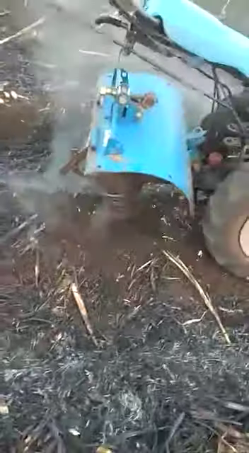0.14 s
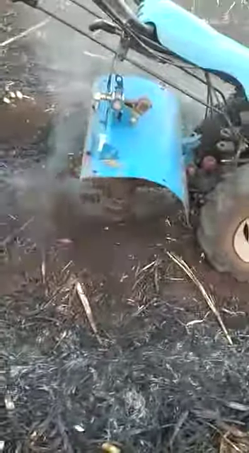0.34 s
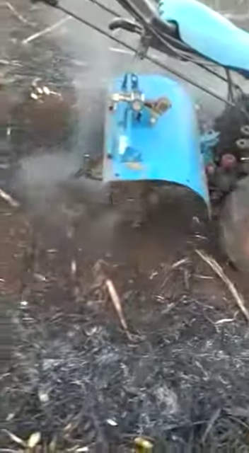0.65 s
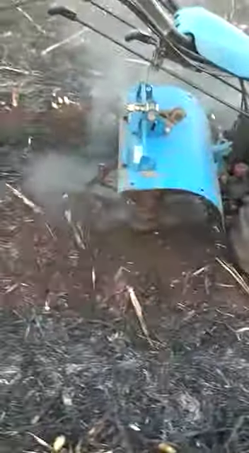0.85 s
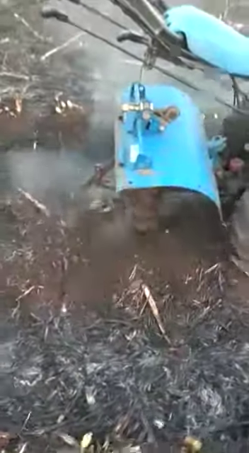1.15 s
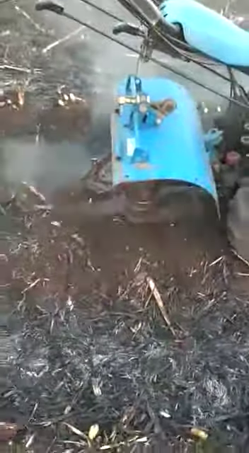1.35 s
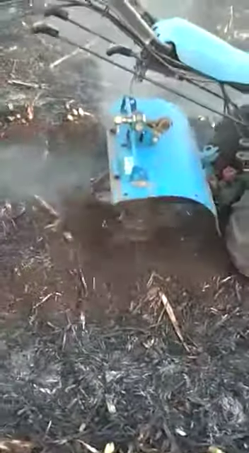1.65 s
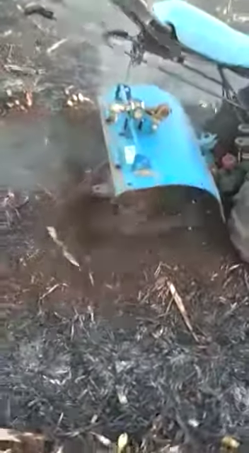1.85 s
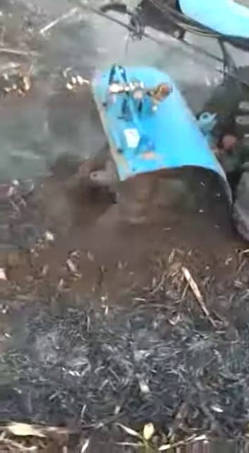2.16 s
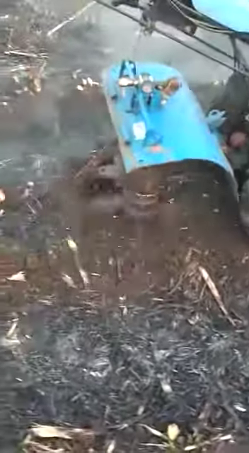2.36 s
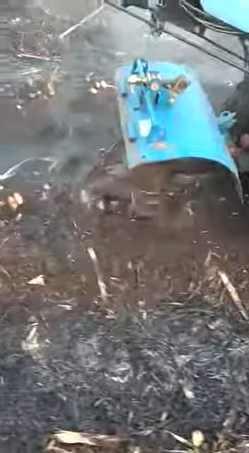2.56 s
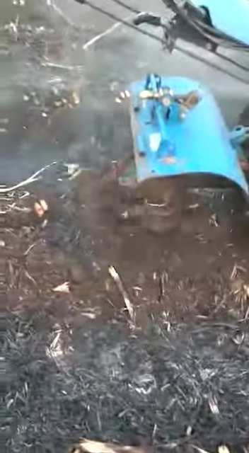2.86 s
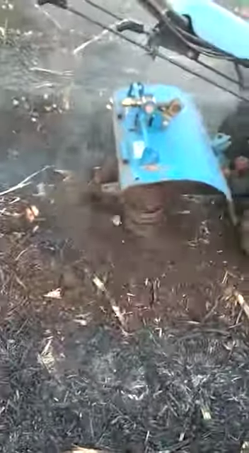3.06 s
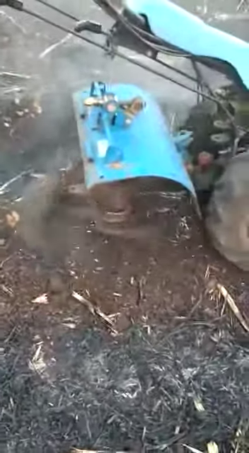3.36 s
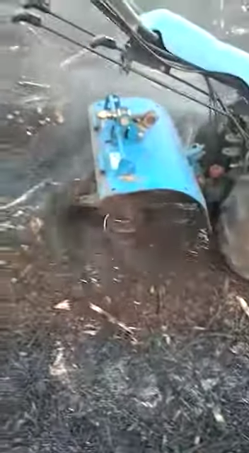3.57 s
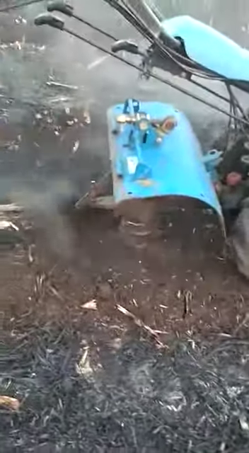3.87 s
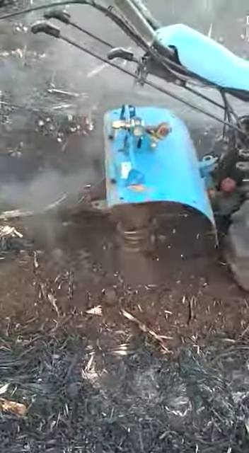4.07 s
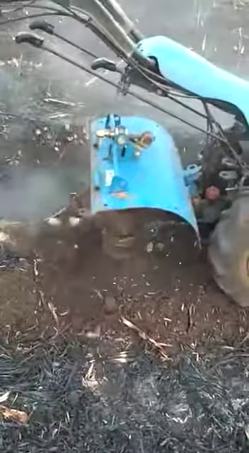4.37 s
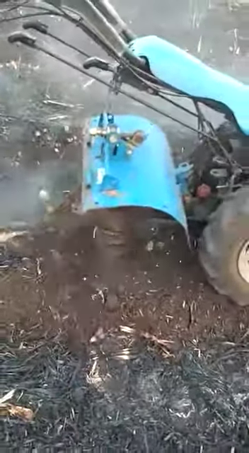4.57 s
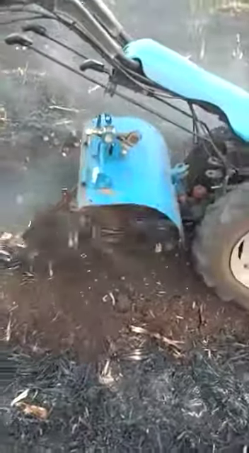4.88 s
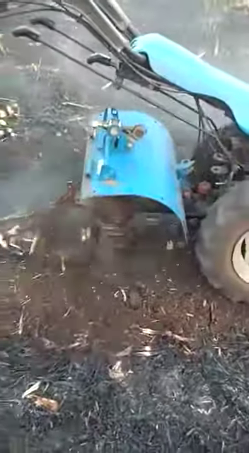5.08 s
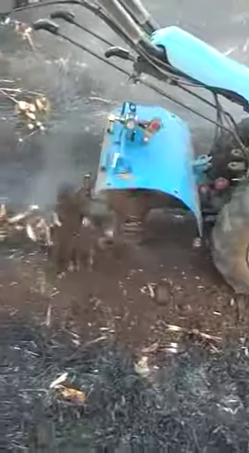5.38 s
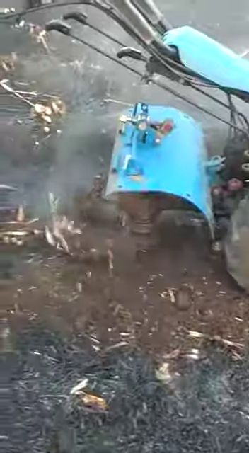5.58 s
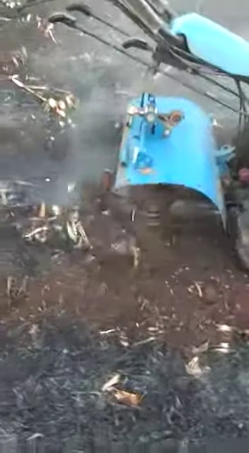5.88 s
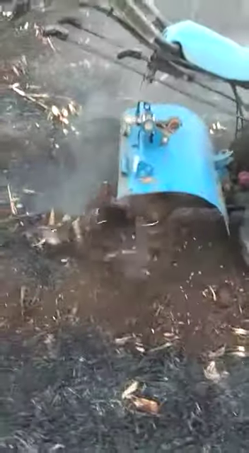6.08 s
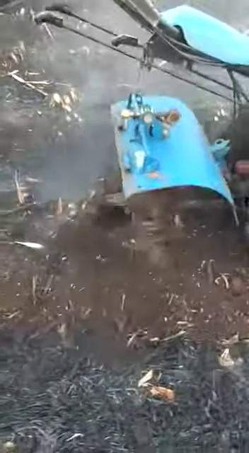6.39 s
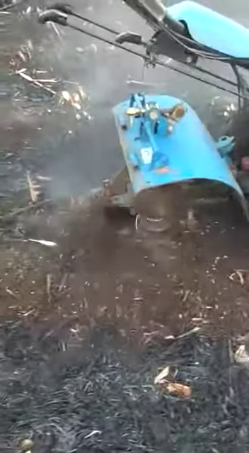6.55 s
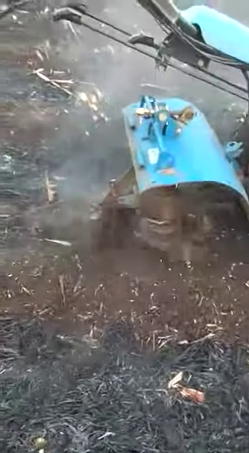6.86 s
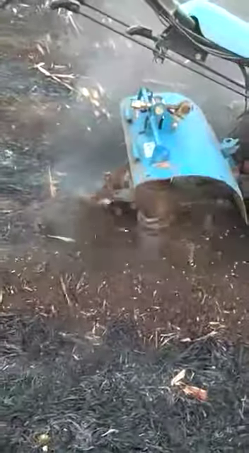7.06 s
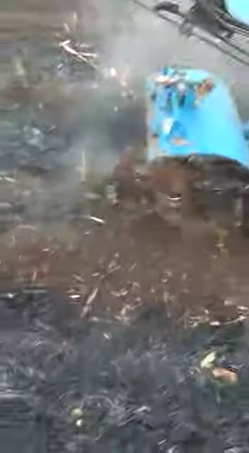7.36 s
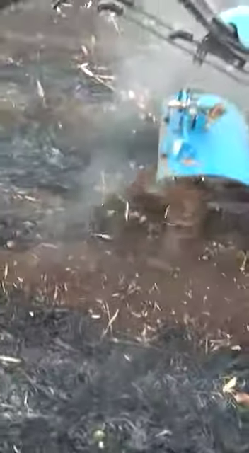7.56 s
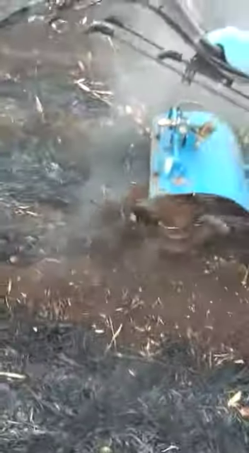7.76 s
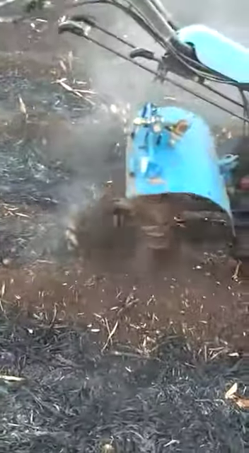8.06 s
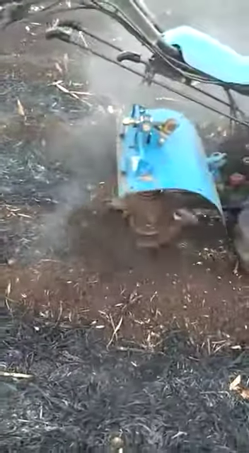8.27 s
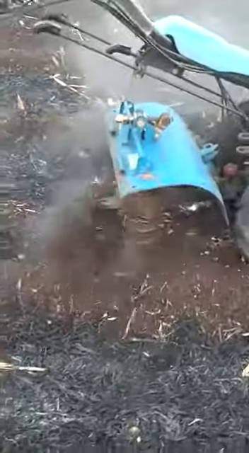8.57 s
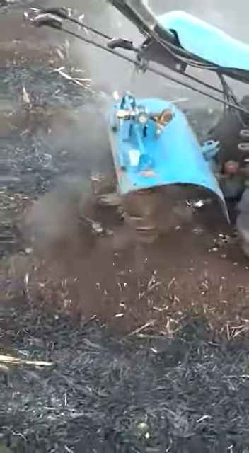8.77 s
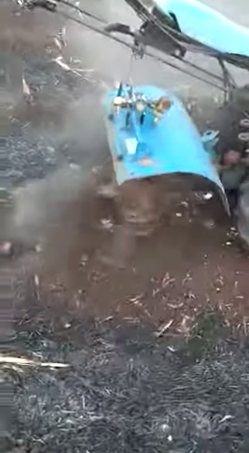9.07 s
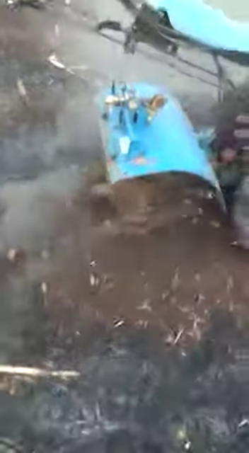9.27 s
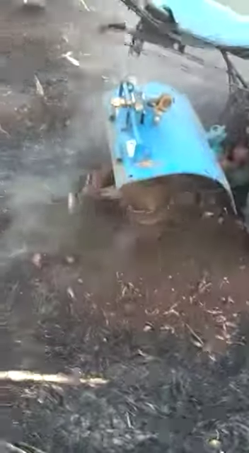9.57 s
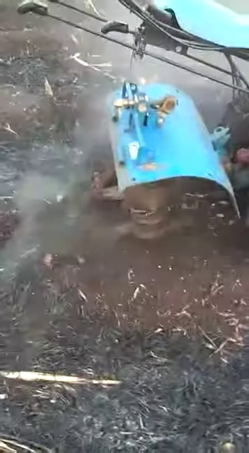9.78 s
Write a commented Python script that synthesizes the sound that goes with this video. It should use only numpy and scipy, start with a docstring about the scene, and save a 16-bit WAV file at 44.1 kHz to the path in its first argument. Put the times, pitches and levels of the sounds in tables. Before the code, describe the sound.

Close, continuous clatter of cane stubble chopped beneath a metal hood, with rapid diesel knocking, sharp cracks, clinks and thin dry squeals in an open field.

```python
"""Stalks rattle and crackle under the steel hood of a walk-behind tiller while its diesel knocks and puffs.
The single cylinder fires about 16 times a second: pulsed noise rings its metal and exhaust pipe.
Noise grains ring the hood and splinters as cane stubble is shredded; shaped noise makes flung grit.
Blurred sines make clods, clinks and guard knocks; a wavering tone with rasp is the dry bearing's squeal.
Scrapes, tumbling soil and a broad rumble fill the open field around them."""
import sys
import numpy as np
from scipy import signal
from scipy.fft import rfft, irfft, next_fast_len
from scipy.io import wavfile
from scipy.ndimage import uniform_filter1d

SR = 44100
rng = np.random.default_rng(int(sys.argv[2]) if len(sys.argv) > 2 else 0)


def digitize_waveform(pressure):
    """Quantize a signal to 16-bit integers and store it at the path in sys.argv[1].

    Rows of a 2-D input are taken as channels; values are limited to [-1, 1].
    """
    field = np.atleast_2d(pressure).T
    bounded = np.clip(field, -1, 1)
    quanta = np.round(bounded * 32767).astype(np.int16)
    wavfile.write(sys.argv[1], SR, quanta)


N = 437913

# engine speed, sagging and recovering: [t/s, firing rate/Hz]
SPEED = [(0, 15.846), (1.53, 15.876), (1.76, 15.756), (1.97, 15.483), (2.18, 15.44), (2.67, 16.133),
         (3.3, 15.725), (3.74, 15.952), (4.14, 15.733), (4.64, 15.71), (6.18, 15.927), (6.27, 15.767),
         (7.64, 15.857), (8.11, 15.651), (9.03, 15.767), (9.41, 16.058), (9.7, 15.771), (9.93, 15.659)]
# knock of block and crankcase: [t/s, relative level/dB]
KNOCK = [(0, -26), (0.6, -22.5), (1.58, -22.5), (2.3, -31.5), (2.85, -29), (3.25, -30.5), (3.95, -27),
         (4.35, -24), (4.7, -26.5), (5.8, -23), (6.35, -25), (6.95, -42.5), (7.75, -28.5), (8.08, -44),
         (8.52, -29), (9.15, -42), (9.54, -27), (9.93, -59)]


def from_db(db):
    """Decibels to gain."""
    return 10 ** (np.asarray(db) / 20)


def rms_one(x):
    """Scale to unit power."""
    return x / np.sqrt(np.mean(x ** 2) + 1e-20)


def even(x, size):
    """Hold the power near one over stretches of `size` samples, keeping the faster detail."""
    power = np.mean(np.atleast_2d(x) ** 2, axis=0)
    smooth = uniform_filter1d(uniform_filter1d(power, size), size)
    return x / np.sqrt(np.abs(smooth) + 1e-12)


def in_time(rows):
    """Each column of a curve at every sample."""
    s, *columns = np.transpose(rows)
    return [np.interp(np.arange(N) / SR, s, c) for c in columns]


def slow_chance(rate):
    """Smooth chance of spread 1 that changes about `rate` times a second, at every 40th sample."""
    r = np.exp(-80 * np.pi * rate / SR)
    white = rng.standard_normal(N // 40 + 2002)
    smooth = signal.lfilter([1], [1, -2 * r, r * r], white)
    return rms_one(smooth[2000:])  # drop the filter's start-up


def drift(rate):
    """Slow chance at every sample."""
    slow = slow_chance(rate)
    return np.interp(np.arange(N) / 40, np.arange(len(slow)), slow)


def flutter(depth_db, rate):
    """A level in dB that wanders by chance within plus and minus depth_db."""
    return depth_db * np.tanh(drift(rate))


def wobble(depth_db, rate):
    """A randomly wandering gain of unit power; depth_db bounds its swing before that scaling."""
    gain = rms_one(from_db(depth_db * np.tanh(slow_chance(rate))))
    return np.repeat(gain, 40)[:N]


def swells(rows, rest_db, attack_s, release_s):
    """Level in dB of events (s, length s, dB) that rise, hold and die away on top of a resting level."""
    gain, age = np.full(N + 2 * SR, from_db(rest_db)), np.arange(SR) / SR
    for s, length, db in rows:
        start = max(int(s * SR), 0)
        rise = np.minimum(age / attack_s, 1)
        fall = np.exp(-np.maximum(age - length, 0) / release_s)
        gain[start:start + SR] += from_db(db) * rise * fall
    return 20 * np.log10(gain[:N])


def blow(s, rise_s, decay_s):
    """Envelope of a single blow."""
    out, start = np.zeros(N), max(int(s * SR), 0)
    age = np.arange(min(SR // 3, N - start)) / SR
    out[start:start + len(age)] = (1 - np.exp(-age / rise_s)) * np.exp(-age / max(decay_s, .002))
    return out


def bursts(per_s, decay_s, spread_db):
    """Power of random impacts that start at once and die away; mean 1."""
    strength = from_db(spread_db * np.clip(rng.standard_normal(N), -2, 2)) ** 2
    hits = (rng.random(N) < per_s / SR) * strength
    power = signal.lfilter([1], [1, -np.exp(-2 / (decay_s * SR))], hits + 1e-18)
    return power / np.mean(power)


def stroke(cycle, at, rise_s, decay_s, spread_db):
    """A swell and decay once per engine cycle, starting at the cycle share `at`, each of its own strength."""
    count, share = np.divmod(cycle - at + 2, 1)
    age = share / np.mean(np.array(SPEED)[:, 1])
    strengths = from_db(spread_db * np.clip(rng.standard_normal(200), -2, 1.5))
    swell = (1 - np.exp(-(age / rise_s) ** 2)) * np.exp(-age / decay_s)
    return rms_one(strengths[count.astype(int)] * swell)


def hiss(scatter):
    """Stereo white noise: a direct part common to both ears and a scattered part for each."""
    white, scatter = rng.standard_normal((3, N)), np.clip(scatter, 0, 1)
    return np.sqrt(1 - scatter) * white[0] + np.sqrt(scatter) * white[1:]


def colour(x, spectrum, share=1):
    """Shape a sound by a smooth spectrum, its decibels multiplied by `share`."""
    size = next_fast_len(N + 2000)
    hz, db = np.transpose(spectrum)
    bins = np.maximum(np.arange(size // 2 + 1) * SR / size, 1)
    gain = from_db(share * np.interp(np.log(bins), np.log(hz), db))
    return irfft(rfft(x, size) * gain, size)[..., :N]


def resonate(x, modes, patchy_db=0, rate=12):
    """Parallel resonances of alternating sign; as the point of contact moves, each is driven more or less."""
    out, x = np.zeros(np.shape(x)), x + 1e-18
    for k, (hz, width, db) in enumerate(modes):
        r = np.exp(-np.pi * width / SR)
        top = (-1) ** k * from_db(db) * (1 - r * r) / 2
        drive = x * wobble(patchy_db, rate) if patchy_db else x
        out += signal.lfilter([top, 0, -top], [1, -2 * r * np.cos(2 * np.pi * hz / SR), r * r], drive)
    return out


def struck(events, level_db, rise_s, decay_s, rough):
    """Each blow rings a part at a pitch of its own, blurred by the chatter of the contact."""
    t, blur = np.arange(N) / SR, rough * drift(60)
    out = np.zeros(N)
    for s, db, hz in events:
        swell = blow(s, rise_s, decay_s)
        on = swell > 0
        out[on] += from_db(db + level_db) * swell[on] * np.sin(2 * np.pi * hz * t[on] + blur[on])
    return out


def over_ground(x, delay_s, sway_s, share):
    """Add the reflection from the ground; its delay sways as the machine rocks, and so does the colour."""
    n = np.arange(N)
    lag = (delay_s + sway_s * drift(1.77)) * SR
    echo = np.array([np.interp(n - lag, n, ear) for ear in x])
    return (x + share * echo) / np.sqrt(1 + share ** 2)


def rumble():
    """Gears and soil make a broad, nearly central noise whose level wanders."""
    # rumble spectrum: [f/Hz, relative level/dB]
    rumble_spectrum = [(25, -23), (50, -5), (90, -3), (170, 0.5), (320, 4), (500, 12), (800, -3.5),
                       (1050, -24), (1300, 6.5), (2000, 7.5), (3000, 7.5), (8000, -3), (15000, 3)]
    return from_db(-40) * rms_one(colour(hiss(0.04), rumble_spectrum)) * wobble(5.2, 8.1)


def soil():
    """Crumbs of earth drum all the time in the hollow under the hood."""
    # hollow under the hood: [f/Hz, width/Hz, relative level/dB]
    hollow_modes = [(516, 42, 0.5), (869, 89, 1.5), (1012, 41, 2.5), (1085, 49, 2.5)]
    drumming = hiss(0.48) * np.sqrt(0.32 + bursts(60, 0.0018, 2.9))
    hollow = resonate(drumming, hollow_modes, patchy_db=8.0, rate=6.7)
    hollow = resonate(hollow, [(990, 1400, 0)])
    level_db = -46 + flutter(depth_db=5.5, rate=6.5)
    return from_db(level_db) * even(hollow, size=4000)


def hum(cycle):
    """The running engine shakes its frame at a few multiples of the firing rate."""
    # steady partials: [multiple of the firing rate, rms level/dB]
    partials = [(7, -65.5), (8, -71.5), (11, -60), (17, -66.5)]
    out = np.zeros(N)
    for order, db in partials:
        tone = np.sqrt(2) * np.sin(2 * np.pi * (round(order) * cycle + rng.random()))
        out += from_db(db) * wobble(2.1, 6.5) * tone
    return out


def guard(cycle):
    """A sheet-metal guard is jolted by the valve gear and on each of the two crank turns of a cycle."""
    # sheet-metal modes: [f/Hz, width/Hz, relative level/dB]
    guard_modes = [(685.6, 22.6, 1), (755.4, 19.6, -1), (766, 28, -6.5)]
    # rattle: [t/s, relative level/dB]
    shaking = [(0, -30), (0.65, -32), (1.4, -34), (2.1, -41), (3.1, -49), (3.4, -43.5), (4.3, -41.5),
               (4.9, -37), (5.4, -29.5), (5.8, -32), (6.7, -42.5), (7.1, -36), (7.8, -33.5), (8.05, -53),
               (8.35, -46.5), (9.93, -42)]
    jolts = 0.18 + stroke(cycle, -0.084, 0.0013, 0.0094, 4.5)
    jolts += 1.4 * stroke(cycle, 0.4, 0.00076, 0.0048, 9.6)
    jolts += 0.59 * stroke(cycle, -0.334, 0.00095, 0.0043, 3.9)
    ring = resonate(resonate(hiss(0.046) * jolts, guard_modes), [(757, 137, 0)])
    level_db = in_time(shaking)[0] + flutter(depth_db=3.5, rate=2.8)
    return from_db(level_db - 5.5) * even(ring, size=5500)


def guard_knocks():
    """The guard knocks against its bracket and rings briefly near 700 Hz."""
    # knocks: [t/s, relative level/dB, f/Hz]
    knocks = [(0.056, -25, 705), (0.157, -22.5, 730), (0.245, -23.5, 716), (0.31, -27, 692),
              (0.449, -27, 705), (0.497, -23, 716), (0.6, -25, 694), (0.623, -20.5, 705), (0.877, -23, 705),
              (0.918, -24.5, 729), (0.97, -19.5, 716), (1.068, -24, 702), (1.32, -21, 708),
              (1.385, -21, 727), (1.476, -23, 716), (1.829, -24, 719), (4.479, -26, 711), (4.835, -26, 686),
              (4.942, -22.5, 721), (5.116, -25, 694), (5.35, -27.5, 732), (5.408, -23, 700),
              (5.466, -22.5, 711), (5.558, -27, 700), (5.59, -21.5, 706), (5.636, -29, 740),
              (5.749, -22.5, 690), (5.807, -22.5, 705), (5.986, -30, 711), (7.175, -25, 711),
              (7.341, -28, 721), (7.49, -29, 736), (7.768, -28, 694), (8.27, -29.5, 713), (8.449, -30, 715),
              (8.675, -31, 688)]
    return struck(knocks, 1.0, rise_s=0.0013, decay_s=0.019, rough=0.27)


def exhaust(cycle):
    """A thump at firing, then the valve opens and gas leaves in three surges that ring the pipe."""
    # exhaust pipe: [f/Hz, width/Hz, relative level/dB]
    pipe_modes = [(180, 55, 0.91), (220, 63, -2.6), (268.4, 34, -0.81)]
    # spells of louder puffs: [t/s, length/s, relative level/dB]
    puffs = [(-0.01, 0.31, -43.5), (0.38, 0.14, -34.5), (1.03, 0.27, -54), (2.496, 0.23, -52),
             (3.2, 0.27, -56), (3.679, 0.1, -42), (4.321, 0.1, -49), (5.406, 0.7, -43.5),
             (6.781, 0.13, -42.5), (7.128, 0.57, -41), (9.002, 0.52, -48.5)]
    surge_spread_db = 3  # the surges differ from stroke to stroke
    thump = from_db(-3.0) * stroke(cycle, -0.0815, 0.0011, 0.002, 0.93)
    opening = from_db(5.5) * stroke(cycle, 0.124, 0.001, 0.0035, surge_spread_db)
    blowdown = from_db(8.0) * stroke(cycle, 0.2527, 0.0018, 0.0023, surge_spread_db)
    last = from_db(-3.0) * stroke(cycle, 0.431, 0.0009, 0.0024, surge_spread_db)
    gas = (thump + opening + blowdown + last) * (1 + .4 * hiss(0.17))  # pressure with turbulence
    gas = signal.sosfilt(signal.butter(4, [150, 340], "band", fs=SR, output="sos"), gas)
    ring = even(resonate(gas, pipe_modes, patchy_db=4.5, rate=13.0), size=8400)
    level_db = swells(puffs, rest_db=-51, attack_s=0.055, release_s=0.057)
    level_db = level_db + flutter(depth_db=4.0, rate=6.6)
    return from_db(level_db - 4.0) * ring


def valves(cycle):
    """The valve gear ticks three times a cycle, as wide noise ringing high metal modes."""
    # valve gear: [f/Hz, width/Hz, relative level/dB]
    valve_modes = [(5370, 73, -10), (8050, 760, -2.5), (9490, 150, 13), (10530, 110, 14), (11960, 900, -2)]
    # ticking: [t/s, relative level/dB]
    ticking = [(0, -23), (1.5, -24), (2.9, -26), (3.5, -24.5), (5, -24.5), (5.9, -25.5), (6.6, -24.5),
               (7.6, -26.5), (8.5, -38), (9, -31), (9.93, -27.5)]
    ticks = stroke(cycle, -0.267, 0.0029, 0.0034, 3.5)
    ticks += 0.32 * stroke(cycle, 0.032, 0.0014, 0.0046, 8.8)
    ticks += 0.054 * stroke(cycle, 0.43, 0.001, 0.0047, 2.7)
    return from_db(in_time(ticking)[0] - 8.5) * rms_one(resonate(hiss(0.92) * ticks, valve_modes))


def block(cycle):
    """The piston slaps the block around firing and about a turn later."""
    # engine block: [f/Hz, width/Hz, relative level/dB]
    block_modes = [(491, 35, -24), (750, 220, -15.5), (1000, 19, -30), (1394, 31, 8), (1740, 45, -32)]
    slaps = 1.12 * stroke(cycle, -0.099, 0.0031, 0.011, 0.73)
    slaps += stroke(cycle, 0.012, 0.0034, 0.0063, 2.4)
    slaps += 0.6 * stroke(cycle, 0.433, 0.0042, 0.0071, 3.0)
    ring = even(resonate(hiss(0.19) * slaps, block_modes), size=2800) * wobble(7.7, 31)
    return from_db(in_time(KNOCK)[0] - 8) * ring


def crankcase(cycle):
    """The crankcase rings at every firing, following the knock above a steady floor."""
    # crankcase: [f/Hz, width/Hz, relative level/dB]
    case_modes = [(1405, 49, 0)]
    firing = hiss(0.15) * stroke(cycle, -0.041, 0.0018, 0.0034, 1.0)
    ring = resonate(resonate(firing, case_modes), [(1393, 147, 0)])
    ring = even(ring, size=2800) * wobble(4.0, 19)
    return np.hypot(from_db(-44), from_db(in_time(KNOCK)[0] - 10.5)) * ring


def head(cycle):
    """Combustion cracks in the cylinder head, dulled in the treble and wandering in level."""
    # cylinder head: [f/Hz, width/Hz, relative level/dB]
    head_modes = [(1880, 70, 0), (2065, 31, -4)]
    # crack of combustion: [t/s, level/dB]
    cracking = [(0, -34.5), (1.2, -31.5), (2.0, -36), (2.8, -34.5), (3.5, -33.5), (4.2, -33.5),
                (5.0, -38.5), (5.8, -44), (6.5, -38.5), (7.5, -38), (8.3, -43), (9.2, -44), (9.93, -36)]
    firing = hiss(0.5) * stroke(cycle, -0.029, 0.0018, 0.0043, 0.83)
    ring = even(resonate(firing, head_modes, patchy_db=10.0), size=2800) * wobble(3, 5.8)
    dull = signal.butter(5, 2470, fs=SR, output="sos")  # low-pass in Hz
    return from_db(in_time(cracking)[0]) * rms_one(signal.sosfilt(dull, ring))


def diesel(cycle):
    """Piston slap, crankcase ring, combustion crack and valve ticks add up to the engine's knock."""
    return block(cycle) + crankcase(cycle) + head(cycle) + valves(cycle)


def bearing():
    """Stick and slip in a dry bearing keep one very high mode ringing, in fits."""
    # squeals: [t/s, length/s, relative level/dB]
    squeals = [(0.096, 0.056, -32), (0.395, 0.046, -32), (0.479, 0.2, -43), (0.511, 0.015, -26.5),
               (0.579, 0.035, -34), (0.954, 0.15, -38), (1.157, 0.12, -40), (1.62, 0.33, -34),
               (1.708, 0.057, -19), (1.856, 0.28, -40), (1.995, 0.015, -28), (2.159, 0.16, -37),
               (2.271, 0.054, -30), (2.371, 0.3, -46), (2.478, 0.015, -23.5), (2.662, 0.016, -27),
               (3.105, 0.26, -41), (3.839, 0.3, -41), (4.302, 0.13, -32.0), (4.526, 0.29, -39),
               (4.546, 0.038, -19.0), (4.673, 0.02, -22), (4.761, 0.23, -38), (4.949, 0.3, -39),
               (4.99, 0.015, -28), (5.14, 0.08, -31), (5.153, 0.011, -24), (5.276, 0.035, -22),
               (5.432, 0.11, -29), (5.5, 0.043, -25), (5.583, 0.1, -38.0), (6.098, 0.18, -27.5),
               (6.24, 0.015, -35), (6.322, 0.15, -38.0), (6.657, 0.025, -29), (6.701, 0.05, -21.5),
               (6.952, 0.2, -42), (7.363, 0.14, -33), (7.619, 0.23, -43), (7.659, 0.13, -33),
               (8.026, 0.17, -37), (8.297, 0.27, -36), (8.322, 0.0086, -18), (8.405, 0.063, -28),
               (8.58, 0.22, -39.5), (8.608, 0.015, -24), (8.86, 0.05, -27), (9.187, 0.11, -32),
               (9.212, 0.018, -30), (9.439, 0.018, -30), (9.63, 0.25, -42), (9.722, 0.014, -16.5)]
    pitch_hz = 14260 + 18 * drift(45)
    tone = np.sqrt(2) * np.sin(2 * np.pi * np.cumsum(pitch_hz) / SR)
    rasp = rms_one(resonate(resonate(hiss(0.98), [(14350, 130, 0)]), [(14200, 120, 0)]))
    level_db = swells(squeals, rest_db=-50.5, attack_s=0.011, release_s=0.014)
    level = from_db(level_db - 6.5) * wobble(2.8, 26)
    return level * (from_db(10.5) * tone + from_db(8.0) * rasp)


def scrapes():
    """A stalk dragged along the hood rubs the steel: a rough swell around one pitch."""
    # scrapes: [t/s of the loudest moment, level/dB, f/Hz, half-length/s]
    rubs = [(1.641, -34, 1670, 0.033), (1.703, -33.5, 1160, 0.036), (2.082, -29.5, 1180, 0.027),
            (2.23, -29, 1110, 0.022), (2.292, -26, 2500, 0.062), (3.397, -32.5, 1040, 0.047),
            (3.669, -36, 1044, 0.052), (4.23, -32, 1135, 0.035), (4.952, -26, 2110, 0.016),
            (7.112, -29, 2440, 0.057), (7.581, -39.5, 984, 0.15), (7.653, -39, 1610, 0.17),
            (8.033, -28.5, 2540, 0.044), (8.196, -27.5, 2550, 0.045), (8.648, -31.5, 1690, 0.051),
            (9.803, -25, 2360, 0.041)]
    out, size = np.zeros((2, N + SR)), SR // 2
    age = np.arange(size) / SR - .25
    for s, db, hz, length in rubs:
        slips = rng.standard_normal(size) + .5 * rng.standard_normal((2, size))
        rub = rms_one(resonate(resonate(slips, [(hz, hz / 7, 0)]), [(hz, hz / 13.0, 0)]))
        start = int((s + age[0]) * SR)
        out[:, start:start + size] += from_db(db) * rub * np.exp(-(age / length) ** 2)
    return out[:, :N]


def clods():
    """Clods thud against the hood: low, softly rising blows."""
    # thuds: [t/s, relative level/dB, f/Hz]
    thuds = [(0.04, -27, 425), (1.815, -29, 358), (1.83, -23, 800), (1.85, -31.5, 560), (2.355, -23, 720),
             (2.407, -26, 495), (2.72, -30, 522), (3.025, -21.5, 720), (3.348, -35, 501), (4.653, -22, 403),
             (5.76, -28, 565), (6.58, -25.5, 482), (6.681, -26, 460), (6.78, -20, 488), (6.89, -29, 942),
             (7.081, -26.5, 528), (7.81, -28, 1055)]
    return struck(thuds, -1.9, rise_s=0.0026, decay_s=0.015, rough=0.49)


def clinks():
    """Stones and loose steel parts clink: high, quick and slightly blurred rings."""
    # clinks: [t/s, relative level/dB, f/Hz]
    clink_events = [(0.408, -14, 2430), (0.443, -19, 2417), (0.645, -26, 4170), (1.654, -9, 3650),
                    (2.472, -13, 1834), (2.866, -13.5, 4120), (3.059, -17.5, 2340), (3.306, -10, 4970),
                    (3.3344, -1, 5470), (4.213, -15, 2430), (4.249, -17, 2380), (4.57, -17.5, 2460),
                    (4.9387, -15, 2325), (7.289, -15.5, 2370), (7.4494, -20, 2360), (7.466, -16, 2390),
                    (7.697, -13, 3550), (8.0544, -12, 3530), (8.3544, -19, 2370), (8.772, -20, 2358),
                    (9.286, 5, 5470), (9.613, -19, 2330), (9.82, -7.5, 2425), (9.9015, -8.5, 2380)]
    return struck(clink_events, -2.5, rise_s=0.00075, decay_s=0.014, rough=0.93)


def sprays():
    """In each spray, grains of grit ring at pitches scattered around its own."""
    # sprays of grit: [t/s, length/s, relative level/dB, f/Hz]
    spray_events = [(0.102, 0.032, -41, 9500), (0.406, 0.13, -35, 10540), (0.572, 0.14, -31, 9540),
                    (0.782, 0.053, -29, 10300), (0.933, 0.095, -26, 9470), (1.45, 0.066, -31, 8900),
                    (1.613, 0.13, -45, 9200), (1.712, 0.31, -35, 9200), (1.87, 0.15, -49, 9600),
                    (2.084, 0.13, -40, 9500), (2.267, 0.022, -23, 10900), (2.454, 0.055, -30.5, 10300),
                    (2.889, 0.12, -35, 10050), (3.097, 0.061, -33, 10300), (3.84, 0.14, -42, 9600),
                    (4.076, 0.12, -34, 10000), (4.258, 0.19, -30.5, 10600), (4.294, 0.027, -20, 12000),
                    (4.448, 0.042, -22, 11260), (4.54, 0.035, -42, 9300), (4.56, 0.095, -30, 9600),
                    (4.658, 0.035, -26, 9740), (4.761, 0.065, -26.5, 9600), (4.949, 0.067, -27.5, 9200),
                    (5.098, 0.054, -35, 10100), (5.194, 0.16, -31, 9800), (5.407, 0.091, -34.5, 10300),
                    (5.503, 0.15, -35, 10100), (5.743, 0.042, -33, 10200), (5.94, 0.064, -28, 10100),
                    (6.07, 0.07, -37, 10100), (6.244, 0.083, -36.5, 10200), (6.408, 0.18, -40, 9800),
                    (6.653, 0.11, -40, 9700), (6.95, 0.041, -30, 10200), (7.119, 0.035, -24, 11000),
                    (7.271, 0.05, -28.5, 10800), (7.429, 0.2, -34, 9740), (7.61, 0.19, -31.5, 10900),
                    (7.872, 0.012, -24, 11000), (8.025, 0.031, -18.5, 11200), (8.056, 0.12, -37.5, 10000),
                    (8.254, 0.055, -28.5, 9860), (8.414, 0.054, -39, 10100), (8.576, 0.052, -31, 9870),
                    (8.87, 0.077, -37, 9600), (9.206, 0.015, -42, 10760), (9.715, 0.088, -33, 10200)]
    out, age = np.zeros((2, N + SR)), np.arange(SR // 3) / SR
    for s, length, db, hz in spray_events:
        sizes = [(f, f / 50, 4 * rng.normal()) for f in hz * np.geomspace(.92, 1.35, num=9)]
        grains = rms_one(resonate(rng.standard_normal((2, len(age))), sizes))
        start = max(int(s * SR), 0)
        swell = np.minimum(age / 0.012, 1) * np.exp(-np.maximum(age - length, 0) / .014)
        out[:, start:start + len(age)] += from_db(db + 4.0) * grains * swell
    return out[:, :N]


def loose_grit():
    """Flung grit hisses in irregular showers of bright noise, at unit power."""
    # grit spectrum: [f/Hz, relative level/dB]
    grit_spectrum = [(3000, -48), (7000, 1), (10000, 14.5), (12000, 15), (13500, 7), (15000, 5),
                     (16000, -29.5)]
    shower = hiss(0.98) * np.sqrt(0.22 + bursts(760, 0.0042, 7.9))
    return rms_one(colour(shower, grit_spectrum))


def hood_ring():
    """Grains of impact ring the steel hood, which caked earth damps, at even power."""
    # cutter hood: [f/Hz, width/Hz before damping, relative level/dB]
    hood_modes = [(1070, 43, -15), (1358, 60, -7.5), (1710, 40, 9), (1886, 210, -4), (2335, 33, 5),
                  (2422, 62, 2), (2645, 35, 8.5), (2865, 55, -4.5), (3198, 35, 1.5), (3510, 30, 11.5),
                  (3637, 37, 8.5), (4050, 45, 7), (4188, 45, 8.5), (4570, 40, 2), (4960, 70, 7),
                  (5157, 49, 4), (5424, 34, 9.5), (5610, 37, 2.5), (5810, 37, 7), (6270, 50, 3),
                  (6550, 50, 2.5), (7120, 68, -6), (7330, 45, -7), (8380, 34, -3.5), (8820, 210, 2.5),
                  (9520, 76, 3), (10580, 85, 2.5)]
    damping_hz = 45  # no ring is narrower
    grains = rms_one(np.sqrt(0.64 + bursts(1200, 0.00069, 1.0)) * hiss(0.72))
    damped = [(hz, max(width, damping_hz), db) for hz, width, db in hood_modes]
    return even(resonate(grains, damped, patchy_db=12.0, rate=6.55), size=1500)


def shredding(snaps):
    """Splinters of every length ring briefly, each at its own pitch, at even power."""
    # shredding spectrum: [f/Hz, relative level/dB]
    shred_spectrum = [(200, -43), (450, -17.5), (900, -13), (2200, -10), (2750, 26), (3000, 12), (3300, 12),
                      (3550, 10.5), (3880, 7), (4150, 23), (4380, 11.5), (4900, 18.5), (7000, 17.5),
                      (9500, 17.5), (11500, -10), (16000, -24)]
    splinters = [(hz, hz / 85, 0) for hz in np.geomspace(3270, 10400, num=32)]
    cracks = resonate(snaps, splinters, patchy_db=11.0, rate=7.5) + 0.11 * snaps
    return even(colour(cracks, shred_spectrum), size=1500)


def feed():
    """Levels of ring and crackle in the cutter: each bunch is drawn in, shredded and thrown clear."""
    # bunches of stalks: [t/s, length/s, relative hood ring level/dB, relative crackle level/dB]
    bunches = [(0.0, 0.014, -35, -44), (0.076, 0.059, -33, -46), (0.263, 0.082, -56, -29.5),
               (0.375, 0.3, -36.5, -38), (0.395, 0.011, -47, -36), (0.567, 0.14, -45, -41),
               (0.571, 0.051, -34, -35), (0.734, 0.12, -45, -40), (0.754, 0.26, -39, -34),
               (0.942, 0.071, -37, -35), (0.974, 0.42, -43, -35), (1.177, 0.055, -39, -30),
               (1.257, 0.27, -42, -35.5), (1.337, 0.014, -31, -34), (1.449, 0.22, -43.5, -34.5),
               (1.481, 0.032, -44, -23.5), (1.62, 0.076, -32, -34), (1.684, 0.27, -43, -26.5),
               (1.824, 0.12, -37, -26), (1.828, 0.27, -34.5, -35), (1.995, 0.033, -42, -21),
               (2.055, 0.25, -33.5, -26.5), (2.087, 0.013, -28, -20), (2.271, 0.011, -36, -18),
               (2.454, 0.081, -31, -28), (2.458, 0.038, -45, -18.5), (2.766, 0.23, -41, -45),
               (2.85, 0.01, -37, -50), (3.033, 0.16, -38.5, -39), (3.289, 0.057, -48, -33),
               (3.628, 0.044, -50, -26), (3.759, 0.075, -38, -46), (3.851, 0.28, -41, -31),
               (3.883, 0.074, -36, -46), (4.135, 0.28, -38, -44), (4.274, 0.013, -45, -25),
               (4.302, 0.28, -41.5, -26.5), (4.534, 0.26, -44, -33), (4.665, 0.044, -34, -20.5),
               (4.749, 0.22, -44.5, -42), (4.905, 0.22, -42, -34), (4.941, 0.087, -30, -22),
               (5.212, 0.16, -33.5, -27), (5.272, 0.053, -32.5, -33), (5.416, 0.27, -35.5, -40),
               (5.436, 0.084, -44, -29), (5.607, 0.024, -30, -39), (5.735, 0.048, -34, -36),
               (5.927, 0.071, -59, -37.5), (6.018, 0.27, -38.5, -33.5), (6.082, 0.14, -43.5, -37),
               (6.409, 0.3, -42.5, -32), (6.417, 0.012, -34, -24), (6.661, 0.11, -36, -31),
               (6.665, 0.048, -33, -41), (6.944, 0.26, -39.5, -40), (6.96, 0.039, -28.5, -22),
               (7.08, 0.18, -47, -28), (7.271, 0.047, -53, -24), (7.411, 0.18, -35.5, -30),
               (7.455, 0.25, -44, -29), (7.519, 0.022, -28, -23), (7.635, 0.18, -36, -34),
               (7.651, 0.047, -34, -28), (7.866, 0.27, -47, -34.5), (7.874, 0.022, -32, -27),
               (8.034, 0.035, -50, -26), (8.102, 0.27, -44, -44), (8.138, 0.031, -31, -34),
               (8.177, 0.019, -33, -21.5), (8.265, 0.094, -33, -31), (8.401, 0.063, -35.5, -30),
               (8.584, 0.14, -42, -37), (8.596, 0.027, -33, -26), (8.656, 0.027, -45, -22),
               (8.868, 0.02, -36, -28.5), (9.027, 0.1, -49, -29.5), (9.239, 0.22, -44, -39),
               (9.431, 0.02, -35.5, -29), (9.718, 0.13, -30, -20), (9.894, 0.012, -31, -40)]
    litter_db = -44  # the blades keep stirring litter between the bunches
    ring_rows, crackle_rows = np.delete(bunches, -1, axis=1), np.delete(bunches, -2, axis=1)
    return [swells(rows, litter_db, attack_s=0.014, release_s=0.022) for rows in (ring_rows, crackle_rows)]


def cutter():
    """Shredded stalks rattle on the hood in quick bursts, with a spray of grit; hard cracks and ticks stand out."""
    # sharp cracks and ticks, from blades biting stalks or from the engine:
    # [t/s, relative level/dB, decay/s, grit relative to the crack/dB]
    sharp_cracks = [(0.744, -11, 0.008, -12), (0.872, -8, 0.012, -10), (1.2004, -10, 0.022, -26),
                    (1.625, -4, 0.17, -35), (1.742, 1, 0.015, -25), (2.222, -5, 0.016, -17),
                    (2.277, -5, 0.01, -8), (2.4593, -20, 0.054, -28), (2.649, -5.5, 0.034, -33),
                    (3.084, -14, 0.012, -18), (3.29, -14, 0.042, -23), (3.479, -6, 0.014, -19),
                    (3.497, -4, 0.0091, -24), (3.591, -11, 0.0083, -15), (3.731, -10, 0.0082, -29),
                    (4.672, -8, 0.025, -14), (4.9444, -13, 0.2, -19), (5.015, -14, 0.012, -24),
                    (5.1113, -26, 0.02, 5), (5.427, -23.5, 0.038, 6), (5.934, -19, 0.012, 4),
                    (6.4237, -13, 0.02, -17), (6.643, -5, 0.011, -16), (6.9706, -6, 0.016, -11),
                    (7.88, 0.5, 0.028, -14), (8.0417, -21.5, 0.026, 8), (8.1868, 1.5, 0.014, -12.5),
                    (8.6056, -14, 0.012, -14), (8.885, 0.5, 0.066, -33), (8.98, 6, 0.0069, -34),
                    (9.102, -2, 0.0028, -7), (9.168, 4, 0.0091, -21), (9.541, -6, 0.004, -14),
                    (9.666, -7, 0.0045, -15), (9.59, -10.5, 0.006, -6)]
    ring_db, crackle_db = feed()
    rattle = even(np.sqrt(0.14 + bursts(90, 0.057, 3.1)), size=2500)
    # loose grit rises by a share of the crackle, from its level at a heavy feed
    grit_db = -38.5 + 0.32 * (crackle_db + 20)
    force, thrown = from_db(ring_db + 2.22) * rattle, from_db(grit_db) * rattle
    crackle = from_db(crackle_db - 1.9) * rattle
    edge = np.zeros(N)
    for s, db, decay, grit_share_db in sharp_cracks:
        # a very short snap gives each crack its sharp edge
        edge += from_db(db - 30) * blow(s, .0003, .0022)
        crack = from_db(db - 24.0) * blow(s - .002, .001, decay)
        crackle += crack
        force += 0.44 * crack
        thrown += from_db(grit_share_db + 20.0) * crack
    snaps = hiss(1.0) * np.sqrt(.1 + bursts(500, .0008, 4))
    stalks = force * from_db(4.5) * hood_ring() + crackle * from_db(-0.5) * shredding(snaps)
    grit = thrown * loose_grit() + rattle * sprays()
    return over_ground(stalks + grit + edge * snaps, delay_s=.0021, sway_s=.00008, share=0.59)


def scene():
    """Engine and cutter side by side over the broad rumble of gears and soil."""
    cycle = -.02 + np.cumsum(in_time(SPEED)[0]) / SR  # engine cycles, one firing in each
    engine = hum(cycle) + guard(cycle) + exhaust(cycle) + diesel(cycle)
    hits = guard_knocks() + clods() + clinks()
    work = soil() + bearing() + scrapes() + cutter()
    return rumble() + engine + hits + work


def record(dry):
    """Sound reaches the left ear a little later and brighter; high peaks are rounded and the top is cut."""
    # treble balance between the ears: [f/Hz, tilt/dB before each ear's share]
    ear_balance = [(100, 0.5), (700, 0.5), (2000, 1), (4500, 1.5), (7000, 0), (8500, 0), (10000, 6),
                   (10700, 0), (12000, 6), (15000, 2)]
    left = colour(np.pad(dry[0], (4, 0))[:N], ear_balance, share=.5)
    right = colour(dry[1], ear_balance, share=-4.0)
    ears = np.array([left, right])
    rounded = ears / np.sqrt(np.sqrt(1 + np.square(np.square(ears / .85))))
    top_cut = signal.ellip(10, .2, 80, 15750, fs=SR, output="sos")  # low-pass in Hz
    return signal.sosfilt(top_cut, rounded)


dry = scene()
out = record(dry)
digitize_waveform(out)
```